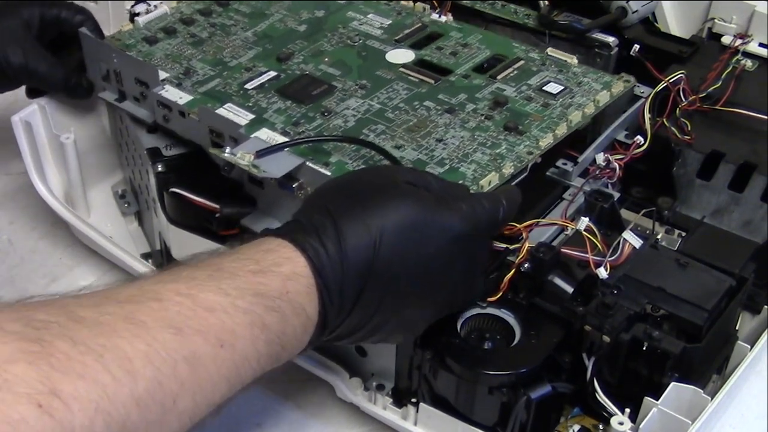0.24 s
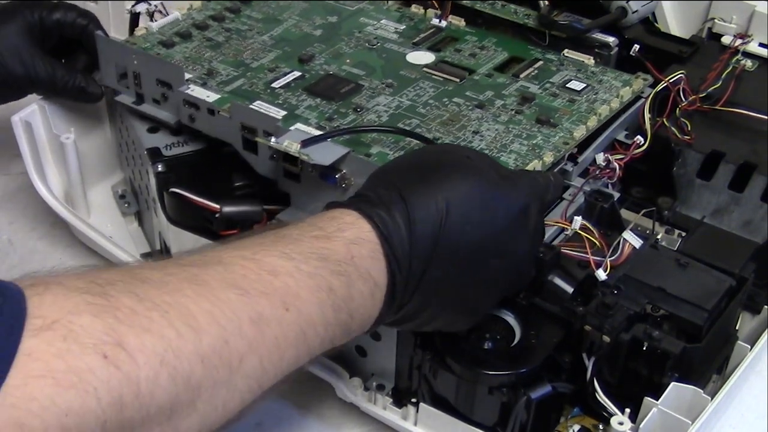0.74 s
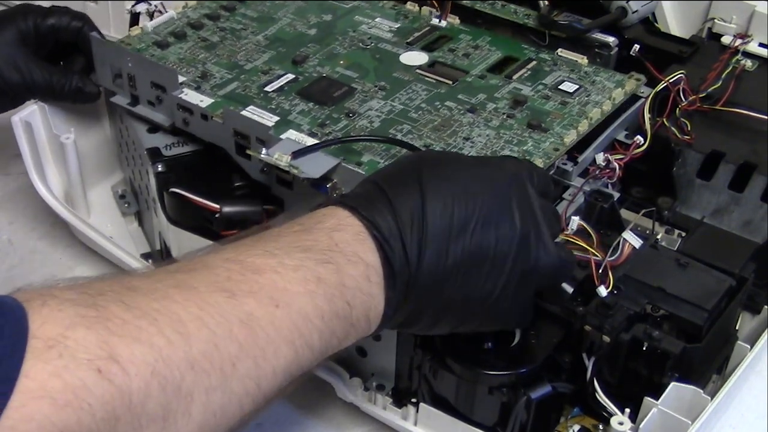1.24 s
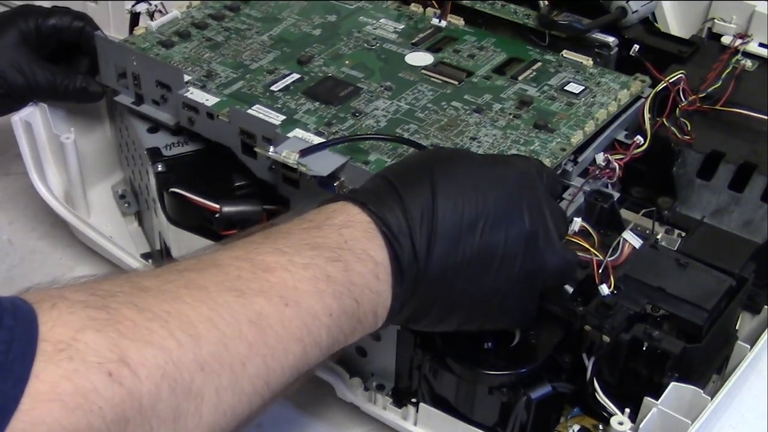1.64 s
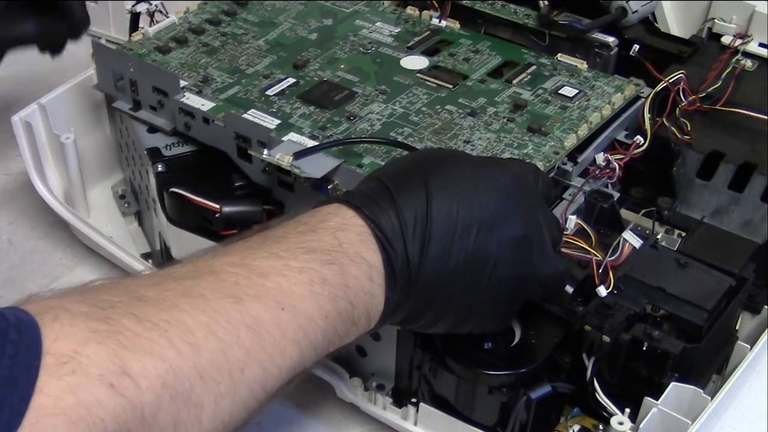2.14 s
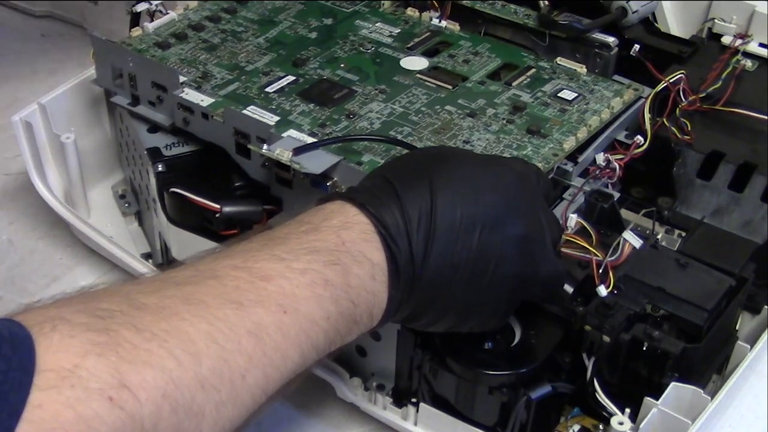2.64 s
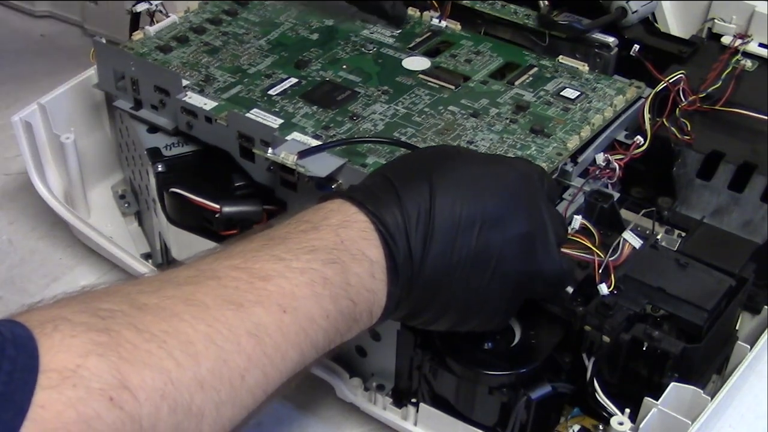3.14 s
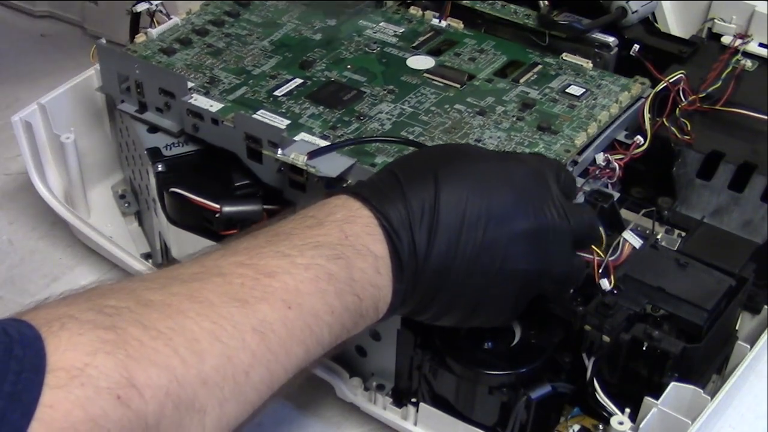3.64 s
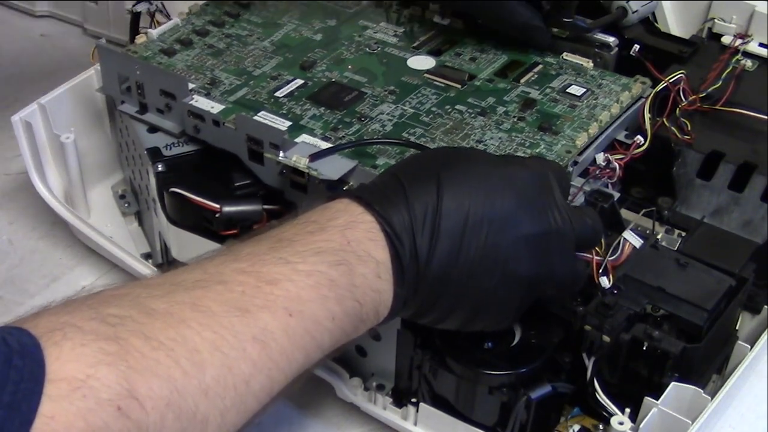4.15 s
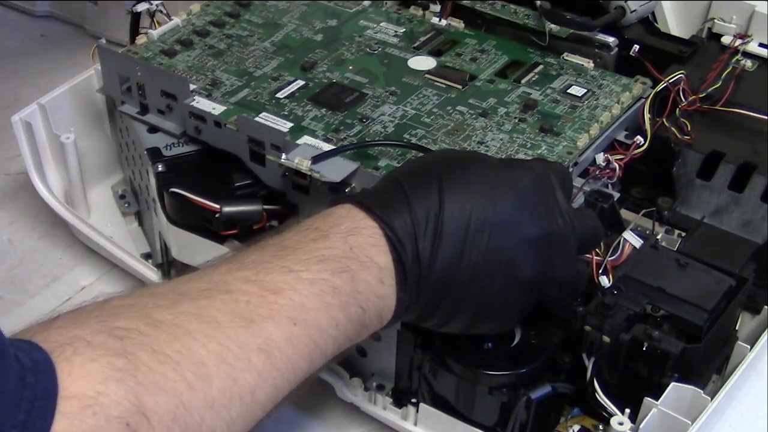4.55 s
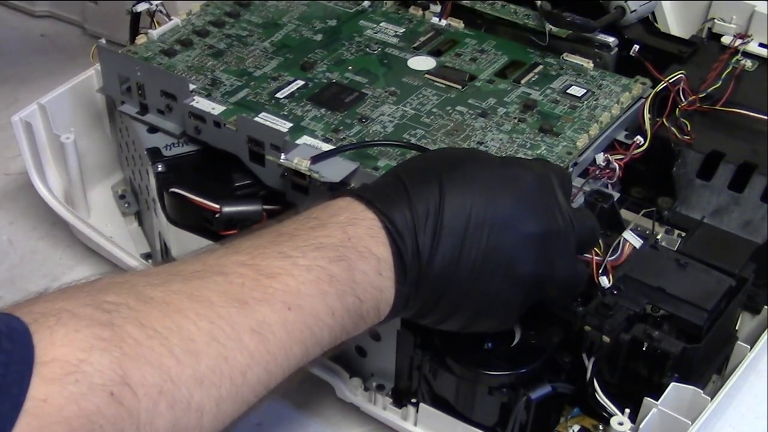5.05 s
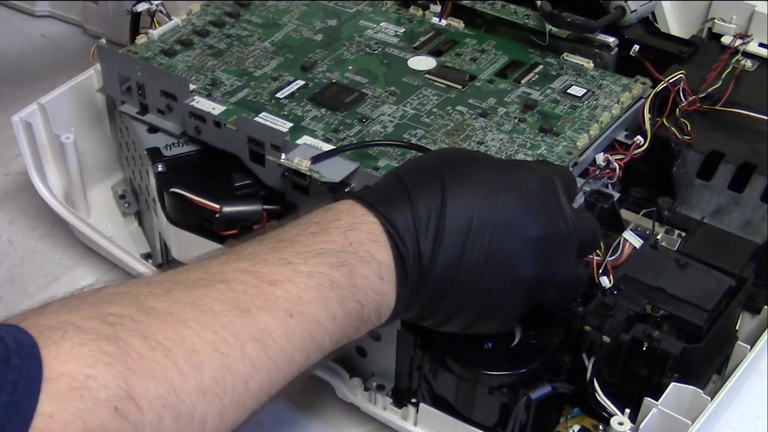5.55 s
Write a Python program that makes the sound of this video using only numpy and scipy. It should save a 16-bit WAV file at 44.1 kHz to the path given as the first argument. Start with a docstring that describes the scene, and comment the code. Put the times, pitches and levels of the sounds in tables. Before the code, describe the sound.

Close stereo pickup in a small, quiet workroom. A circuit board is settled into a sheet-metal tray inside a hollow plastic housing. A sharp early tap with a low boom gives way to faint ticks, then busy clusters of clacks and scrapes around two and three seconds, one bright and metallic. A latch clicks past four seconds, gloves scuff, and the loudest knock comes near the end. Soft ventilation and faint hum continue underneath.

```python
"""In a small workroom, gloved hands seat a circuit board on its sheet-metal tray in an opened plastic housing.
Edges and connectors tap, scrape and snap: noise cracks and decaying sine modes ring one shared chassis,
and narrow-band noise adds the touched part's own note. Gloves scuff, a latch clicks, an edge squeaks,
the housing booms and fingers tick faintly. The room adds a short noise tail, a soft ventilation hush
and a faint mains hum."""
import sys
import numpy as np
from scipy import signal
from scipy.fft import rfft, irfft, next_fast_len
from scipy.io import wavfile
from scipy.ndimage import uniform_filter1d

SR = 44100
rng = np.random.default_rng(int(sys.argv[2]) if len(sys.argv) > 2 else 0)


def bounce(signal):
    """Save signal as a 16-bit WAV file at the path given by the first command-line argument."""
    frames = np.transpose(np.atleast_2d(signal))
    limited = np.clip(frames, -1, 1)
    pcm = np.round(limited * 32767).astype(np.int16)
    wavfile.write(sys.argv[1], SR, pcm)


N = 255339  # length of the scene (samples)
RING = int(SR / 2)  # length of one ringing sound (samples)

# the four registers of a contact, thud to tick: (lower edge [Hz], upper edge [Hz])
REGISTER_EDGES = [(230, 820), (820, 2500), (2500, 6000), (6000, 13500)]
# crowd of weak modes and room echoes: (frequency [Hz], relative level per Hz [dB], time to fall 60 dB [s])
WEAK_MODES = [(119, -20, 0.52), (246, -4, 0.34), (469, 2.5, 0.34), (712, -6, 0.39), (1240, 6, 0.23),
              (2800, -1, 0.22), (6470, -8.5, 0.25), (8730, -7, 0.17), (13400, -20.5, 0.034),
              (16000, -19, 0.015)]


def undb(db):
    """Turn decibels into a gain."""
    return 10 ** (np.asarray(db) / 20)


def unit(x, size=None):
    """Scale a sound so that its first samples have an rms of 1."""
    return x / np.sqrt(np.mean(x[:size] ** 2) + 1e-20)


def add(track, s, x):
    """Mix a sound into a track from time s (seconds)."""
    i = max(int(s * SR), 0)
    track[i:i + len(x)] += x[:max(len(track) - i, 0)]


def fade(t60, hold_s=0):
    """Hold at full level, then die away exponentially, falling 60 dB in t60 seconds."""
    t = np.arange(RING) / SR
    return np.exp(-np.log(1000) * np.maximum(t - hold_s, 0) / t60)


def clump(hz, share):
    """Many closely spaced modes around one frequency, heard as band-limited noise of rms 1."""
    edges = np.minimum([hz / (1 + share), hz * (1 + share)], [.4 * SR, .45 * SR])
    band = signal.butter(2, edges, "band", fs=SR, output="sos")
    noise = signal.sosfilt(band, rng.standard_normal(2 * RING))
    return unit(noise[RING:])  # skip the filter's start


def colour(x, points):
    """Filter by (Hz, dB) points with minimum phase, so nothing rings ahead of a hit."""
    size = 2 * next_fast_len(len(x))
    hz, db = np.transpose(points)[:2]
    f = np.arange(size // 2 + 1) * SR / size
    log_gain = np.log(undb(np.interp(np.log(f + 1), np.log(hz), db)))
    # folding the cepstrum onto positive times makes the filter minimum phase
    cepstrum = irfft(log_gain)[:size // 2]
    cepstrum[1:] *= 2
    return irfft(rfft(x, size) * np.exp(rfft(cepstrum, size)))[:len(x)]


def registers(level_db, bright_db, note_hz):
    """Hard touches tilt towards the treble, soft ones lose it, and the part favours the range of its note."""
    # offset of each register, thud to tick: (level [dB])
    offsets_db = [-1.1, -0.8, -0.55, -6.5]
    pivot_hz = 2000  # the brightness tilts the spectrum about this frequency
    soft_treble_loss = 1  # extra fall of dull touches above the pivot (share of the brightness slope)
    note_lift_db, note_width_octaves = 7.5, 1.41
    centre_hz = np.sqrt(np.prod(REGISTER_EDGES, axis=1))
    octaves = np.log2(centre_hz / pivot_hz)
    tilt_db = bright_db * octaves
    tilt_db += soft_treble_loss * min(bright_db, 0) * np.maximum(octaves, 0)
    distance = np.log2(centre_hz / note_hz) / note_width_octaves
    lift_db = note_lift_db * np.exp(-distance ** 2)
    return level_db + np.array(offsets_db) + tilt_db + lift_db


def balance(x, levels_db, size):
    """Split a sound into its registers and set the level of each over the first samples."""
    out = 0
    for edges, db in zip(REGISTER_EDGES, levels_db):
        band = signal.sosfilt(signal.butter(3, edges, "band", fs=SR, output="sos"), x)
        out = out + undb(db) * unit(band, size)
    return out


def crowd():
    """Countless weak modes blend into noise, each frequency range dying at its own pace, highest treble first."""
    f = np.fft.rfftfreq(RING, 1 / SR)
    hz, _, t60 = np.transpose(WEAK_MODES)
    noise = rfft(rng.standard_normal(RING))
    out = np.zeros(RING)
    for row, decay in zip(np.eye(len(hz)), t60):
        share = np.interp(np.log(f + 1), np.log(hz), row)  # neighbouring ranges overlap
        out += irfft(noise * share, RING) * fade(decay)
    return out


def ring(modes, spot_db, detune, sustain=1):
    """Decaying sine modes, fed and tuned a little differently at each spot of contact."""
    t = np.arange(RING) / SR
    hz, db, t60 = np.transpose(modes)[:, :, None]
    hz = hz * (1 + detune * rng.standard_normal(hz.shape))
    weight = undb(db + spot_db * rng.standard_normal(hz.shape))
    angle = 2 * np.pi * (hz * t + rng.random(hz.shape))
    return np.sum(weight * fade(t60 * sustain) * np.sin(angle.astype(np.float32)), axis=0)


def response(note_hz, contact_ms, metal_db, heavy_db=0, crack_db=10, crack_t60=0.038,
             chatter=0.95, note_db=-2, note_t60=0.11, note_share=0.078):
    """The assembly answers one blow with a crack, ringing modes, the part's note and a diffuse tail."""
    # board in its tray and housing, before detuning: (frequency [Hz], relative level [dB], base t60 [s])
    chassis_modes = [(345, -8, .16), (364, -7, .18), (404, -3, .2), (427, -5, .15), (460, -9, .15),
                     (502, -8, .13), (606, 5, .14), (646, 2, .17), (672, 0, .16), (705, -1, .17),
                     (731, 0, .18), (748, 6, .25), (815, -4, .15), (937, -7, .18), (1007, -5, .14),
                     (1084, -5, .19), (1182, -4, .16), (1286, -2, .16), (1362, -6, .2), (1450, -10, .14),
                     (1573, 3, .19), (1621, -1, .17), (1739, -3, .16), (1785, -1, .15), (2056, -4, .1),
                     (2411, 1, .12), (2634, -5, .13), (2808, -6, .13), (3190, -2, .14), (3620, 1, .14),
                     (3790, 1, .12)]
    # bare sheet-metal edge, before splitting: (frequency [Hz], relative level [dB], t60 [s])
    metal_modes = [(3628, 0, .075), (4735, -11, .1), (5150, 1, .1), (5417, 0, .1), (5560, 1, .09),
                   (5744, -6, .08), (6455, -6, .07), (8000, -3, .08), (8769, 1, .1), (9044, -4, .06),
                   (9367, -8, .06), (9932, 2, .08), (10280, -1, .06), (11140, -4, .04), (11650, -3, .04),
                   (12320, -3, .04)]
    grip_detune = .002  # the grip changes from touch to touch (random share of each frequency)
    metal_split = .007  # the folded sheet splits each mode into a cluster (random share of its frequency)
    sustain = 1 - 0.005 * heavy_db  # heavy blows ring slightly shorter
    contact_s = max(contact_ms, .1) / 1000
    chassis = ring(chassis_modes, spot_db=2.0, detune=grip_detune, sustain=sustain)
    modes = undb(heavy_db - 14.0) * chassis
    # three slightly different copies beat against each other
    metal = sum(ring(metal_modes, spot_db=3.0, detune=metal_split) for _ in range(3))
    modes += undb(metal_db - 9.0) * metal
    # the surfaces chatter while they touch, then the crack dies quickly
    crack = undb(crack_db) * rng.standard_normal(RING) * fade(crack_t60, chatter * contact_s)
    # high-pitched parts have broader notes
    share = note_share * np.sqrt(note_hz / 1000)
    note = undb(note_db) * clump(note_hz, share) * fade(note_t60)
    # a longer contact makes a softer start
    push = 1 - np.exp(-2 * np.arange(RING) / SR / contact_s)
    return colour(push * (crack + crowd() + modes + note), WEAK_MODES)


def slips(size, rate, spread_db):
    """Surfaces catch and let go at random: sparse tiny impacts of uneven strength, rate per second."""
    strength = undb(spread_db * np.minimum(rng.exponential(size=size), 3))
    return (rng.random(size) < rate / SR) * strength * rng.choice([-1, 1], size)


def taps(snap_db=3, snap_hz=10200, snap_t60=0.014, soft_db_per_ms=9):
    """Each contact rings the assembly and adds a bright snap, stronger the shorter the contact."""
    # contacts: (time [s], base level [dB], brightness [dB per octave], note of the touched part [Hz],
    # contact time [ms], relative level of the bare metal ring [dB])
    contacts = [(.025, -63, 0, 3650, 2.3, -15), (0.116, -55, -2.6, 1900, 1.2, -19),
                (0.1765, -47, -0.5, 1920, 2.1, 0), (0.1984, -33, 1.2, 3000, 1.0, -32),
                (.212, -44.5, 0.5, 2270, 1.3, -22), (.227, -49, 1.3, 2500, 1.2, -20),
                (.246, -57, .5, 3180, 1, -20), (0.283, -56, 1.5, 5300, 1.5, -14),
                (0.4152, -46, -2, 1170, 1.3, -24), (0.437, -53, 0, 1550, 0.81, -18),
                (0.492, -54, -1.9, 413, 2, -12), (.653, -55.5, -0.1, 419, 1.9, 0),
                (.785, -55.5, -1.5, 408, 2.9, -12), (.839, -56, 2.5, 5900, 1.6, -9),
                (.912, -58, 0.8, 497, 2.8, -12), (.977, -52, -0.3, 6950, 1.7, -8),
                (.984, -57, -2.5, 369, 3, -12), (1.739, -53, -3.5, 1460, 1.6, -12),
                (1.801, -47, -0.84, 717, 7.6, 0), (1.95, -65.5, 0.5, 8700, 1.9, -9),
                (2.089, -52.5, -0.5, 1920, 2.5, -1), (2.108, -54, 0, 1500, 3, -12),
                (2.116, -47.5, -0.5, 10200, 1.2, -8), (2.124, -50.5, 2, 10200, 1.4, 0),
                (2.129, -48, -2, 480, 1.2, -12), (2.1355, -46, 0.5, 2320, .8, -6),
                (2.151, -50, -2.5, 418, .8, -15), (2.163, -42, -2, 1650, 1, -10),
                (2.1679, -34.5, 2.4, 1110, 1.9, -9), (2.1705, -32.5, 0, 520, 1.5, -15),
                (2.222, -55, -4, 397, 3.1, -20), (2.556, -45, -3.5, 1310, 6.7, -10),
                (2.608, -51.5, -0.5, 423, 0.74, -10), (2.7265, -39, -2.3, 1360, 1.0, -3),
                (2.73, -42, -3.5, 439, 2.3, -16), (2.744, -43.5, -1, 1300, 3.2, -16),
                (2.779, -53, -3.5, 380, 4.4, -16), (2.84, -62, 2, 4500, 3.1, -10),
                (2.891, -53, -0.8, 3040, 1.4, -17), (2.906, -55.5, 0, 2960, 1.2, -12),
                (2.9345, -41, -.5, 5500, 1.5, -21), (3.0342, -36, -1.2, 1410, 1.7, -5),
                (3.064, -28.5, 1, 4800, 0.81, 6), (3.0695, -42, 2.5, 10000, 1.2, -6),
                (3.1398, -43, 0.5, 2900, 1.9, 4), (3.414, -54, -.1, 1190, 3.3, -17),
                (3.606, -54.5, 1.5, 487, 2.2, -12), (3.6645, -44.5, -0.3, 3640, 2.7, 3.5),
                (3.766, -54.5, 0.5, 3560, 1.2, -21), (3.775, -53.5, -1, 1230, 0.59, -21),
                (4.142, -65.5, 1.5, 5060, 1.1, -8), (4.236, -54, -1.5, 3420, 4.7, -10),
                (4.247, -48.5, 0.2, 1550, 3.7, -16), (4.284, -48, 0.4, 3770, 0.38, -5),
                (4.396, -44.5, 2, 3260, .4, -21), (5.226, -68, 0, 3600, 2, -12),
                (5.426, -24, -1.8, 700, 2.4, -24), (5.428, -32, -2, 2400, 3, -24),
                (5.449, -38, -2.4, 660, 3.6, -17), (5.492, -47, -3.5, 740, 5, -20),
                (5.538, -50.5, -0.7, 1700, 4, -1)]
    # above this base level the chassis modes gain on the crack and the part's note (dB per dB)
    heavy_from_db, heavy_ring_db_per_db = -30.5, 1.15
    out = np.zeros(N)
    for s, level_db, bright_db, note_hz, contact_ms, metal_db in contacts:
        levels_db = registers(level_db, bright_db, note_hz)
        heavy_db = heavy_ring_db_per_db * max(level_db - heavy_from_db, 0)
        rung = response(note_hz, contact_ms, metal_db, heavy_db)
        add(out, s, balance(rung, levels_db, size=SR // 50))
        snap = unit(clump(snap_hz, share=.18) * fade(snap_t60), size=SR // 50)
        add(out, s, snap * undb(levels_db[-1] + snap_db - soft_db_per_ms * contact_ms))
    return out


def latch():
    """A stiff plastic tab snaps home: a bright crack, a short ring and a small thud."""
    # broad resonances: (frequency [Hz], relative half width [ratio], starting level [dB], t60 [s])
    latch_modes = [(540, 0.25, -41, 0.24), (3090, 0.15, -18, 0.022), (3060, 0.19, -35.5, 0.17),
                   (5900, 0.064, -38.5, 0.071), (9300, 0.046, -26.5, 0.0097), (12300, 0.047, -30, 0.013)]
    snap_s = 4.3961
    out = np.zeros(N)
    for hz, share, level_db, t60 in latch_modes:
        envelope = fade(t60)
        tone = unit(clump(hz, share) * envelope)
        # undo the scaling by the envelope, so the level is that of the start
        add(out, snap_s, undb(level_db) * tone * np.sqrt(np.mean(envelope ** 2)))
    return out


def scrapes(rate=400, spread_db=6, contact_ms=0.56, metal_db=-12):
    """Sliding edges catch and slip, and each slip rings the chassis."""
    # parts sliding on each other: (start [s], end [s], base level [dB],
    # brightness [dB per octave], note of the sliding part [Hz])
    slides = [(0.211, 0.262, -57.5, -0.5, 398), (0.798, 0.927, -67, -1.5, 414),
              (0.98, 1.05, -64.5, -0.5, 3020), (1.738, 1.848, -60.5, -2.5, 375),
              (2.08, 2.172, -49, -0.2, 480), (2.541, 2.572, -48.5, 1, 1360), (2.611, 2.797, -59, -1, 420),
              (2.737, 2.768, -46.5, -2.5, 1360), (2.878, 3.06, -65, 2.5, 2010),
              (3.247, 3.346, -62.5, -1, 757), (3.61, 3.713, -59.5, 0, 498), (4.139, 4.415, -63, 0, 485),
              (5.03, 5.296, -68, -2, 474), (5.292, 5.35, -55, 0, 800), (5.349, 5.43, -66.5, 1, 9000)]
    out = np.zeros(N)
    for start, end, level_db, bright_db, note_hz in slides:
        size = max(int((end - start) * SR), SR // 50)
        force = slips(RING, rate, spread_db)[:size] * np.sqrt(np.hanning(size))
        blow = response(note_hz, contact_ms, metal_db, crack_db=15.5, crack_t60=0.0092)
        rung = signal.fftconvolve(force, blow)
        add(out, start, balance(rung, registers(level_db, bright_db, note_hz), size=size))
    return out


def scuffs(rate=900, spread_db=2, first_slip_db=7, room_db=-12):
    """A rubber glove catches and slips in a quick run of soft plucks that ring hollow plastic and the room."""
    # glove strokes: (time [s], length [s], level [dB], main resonance of the plastic [Hz])
    strokes = [(0.589, 0.015, -56.5, 1260), (1.445, .02, -43.5, 1000), (3.336, 0.022, -56.5, 1280),
               (4.187, 0.03, -48.5, 1440), (5.037, 0.024, -54.5, 1320), (5.076, .028, -50.5, 1400),
               (5.162, 0.023, -48.5, 1200), (5.264, 0.021, -44.5, 1170)]
    # broad resonances of the plastic:
    # (multiple of the main one [ratio], relative half width [ratio], relative level [dB], t60 [s])
    plastic_modes = [(.6, .3, -5, .02), (1, .2, -1.5, .025), (1.72, .22, -2.5, 0.019),
                     (2.8, .35, -14, .012)]
    out = np.zeros(N)
    for s, length_s, level_db, hz in strokes:
        size = max(int(length_s * SR), SR // 100)
        force = slips(RING, rate, spread_db)[:size]
        force[0] = undb(first_slip_db)
        body = np.zeros(RING)
        for multiple, share, db, t60 in plastic_modes:
            body += undb(db) * clump(hz * multiple, share) * fade(t60)
        rung = signal.fftconvolve(force, body)[:RING]
        tail = crowd()
        echo = signal.fftconvolve(rung, tail / np.linalg.norm(tail))[:RING]
        rung = rung + undb(room_db) * echo
        add(out, s, undb(level_db) * unit(rung, size=size + SR // 200))
    return out


def squeak(waver=0.019, echo_db=-10):
    """An edge sticks and slips as it settles: a brief tone sags to a resting pitch, with its echo."""
    start_s, level_db = 5.538, -48
    start_hz, rest_hz, sag_s = 5110, 4650, 0.0073
    attack_s, hold_s, t60 = 0.0032, 0.022, 0.025  # the hold includes the attack
    t = np.arange(RING) / SR
    pitch = rest_hz + (start_hz - rest_hz) * np.exp(-t / sag_s)
    # small random wavering of the pitch
    pitch = pitch * (1 + waver * unit(uniform_filter1d(rng.standard_normal(RING), size=60)))
    envelope = np.minimum(t / attack_s, 1) * fade(t60, hold_s)
    wave = np.sqrt(2) * np.sin(2 * np.pi * np.cumsum(pitch) / SR)
    tone = undb(level_db) * wave * envelope
    out, tail = np.zeros(N), crowd()
    add(out, start_s, tone)
    add(out, start_s, undb(echo_db) * signal.fftconvolve(tone, tail / np.linalg.norm(tail)))
    return out


def housing(boom_hz=225, boom_t60=0.43):
    """Firm presses reach the hollow plastic shell, which answers with a short low boom."""
    # firm presses: (time [s], level [dB])
    firm_presses = [(0.2, -46), (2.169, -45.5)]
    out = np.zeros(N)
    for s, level_db in firm_presses:
        boom = clump(boom_hz, share=0.11) * fade(boom_t60)
        add(out, s, undb(level_db) * unit(boom, size=SR // 20))
    return out


def fingers(rate=22, spread_db=3, level_db=-75, bright_db=0.8, note_hz=1380):
    """Gloved fingers keep nudging wires and plastic: a faint scatter of tiny ticks."""
    touch = response(note_hz, contact_ms=1.0, metal_db=-6)
    ticks = signal.fftconvolve(slips(N, rate, spread_db), touch)[:N]
    return balance(ticks, registers(level_db, bright_db, note_hz), size=N)


def workroom(hush_db=-53.5, side_db=-19, waver=0.39):
    """Ventilation is shaped noise, nearly alike in both channels; the mains hum is a few wavering sines."""
    # spectrum of the ventilation: (frequency [Hz], relative level per Hz [dB])
    hush_points = [(15, -20), (25, -31), (92, -6.5), (114, -5), (149, -4.5), (180, -1), (270, -2),
                   (301, -1), (624, -6.5), (796, -9), (1190, -13.5), (1330, -14.5), (3340, -19),
                   (3620, -19), (16000, -40.5)]
    # mains hum: (frequency [Hz], level before wavering [dB])
    hum_tones = [(120, -64.5), (180, -68), (240, -75), (300, -66.5)]
    t = np.arange(N) / SR
    mid, side = (unit(colour(rng.standard_normal(N), hush_points)) for _ in range(2))
    knots = np.linspace(0, t[-1], 30)  # times between which the hum level glides
    hum = np.zeros(N)
    for hz, db in hum_tones:
        tone = np.sqrt(2) * undb(db) * np.sin(2 * np.pi * (hz * t + rng.random()))
        hum += tone * (1 + waver * np.interp(t, knots, rng.standard_normal(len(knots))))
    # the side noise enters left and right with opposite sign
    return hum + undb(hush_db) * (mid + undb(side_db) * side * np.array([[1], [-1]]))


def scene(width_db=-23, width_hz=1100):
    """The work lies straight ahead; only its short-wave reflections differ between left and right."""
    parts = taps() + latch() + housing() + scrapes() + scuffs() + fingers() + squeak()
    early = crowd()[:SR // 50] * np.hanning(SR // 50)
    side = undb(width_db) * signal.fftconvolve(parts, early / np.linalg.norm(early))[:N]
    side = signal.sosfilt(signal.butter(1, width_hz, "high", fs=SR, output="sos"), side)
    return parts + side * np.array([[1], [-1]]) + workroom()


def record(dry):
    """Two close microphones differ slightly in gain; the recorder cuts the highest treble."""
    # mismatch of the two microphones: (frequency [Hz], left minus right [dB])
    mic_mismatch = [(100, .4), (1000, .3), (3000, -.5), (8000, -.8), (14000, -.1)]
    top_hz = 15700
    hz, db = np.transpose(mic_mismatch)
    lean_db = np.interp(np.log(np.fft.rfftfreq(N, 1 / SR) + 1), np.log(hz), db)
    # half the mismatch goes to each side
    heard = irfft(rfft(dry) * undb(np.array([[.5], [-.5]]) * lean_db), N)
    return signal.sosfilt(signal.ellip(8, .2, 70, top_hz, fs=SR, output="sos"), heard)


dry = scene()
out = record(dry)
bounce(out)
```